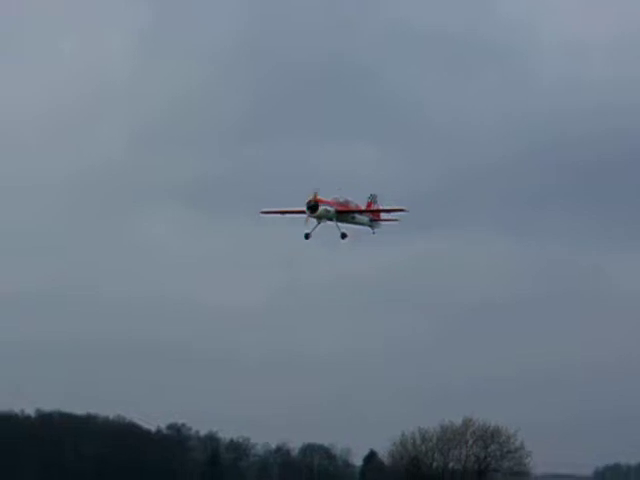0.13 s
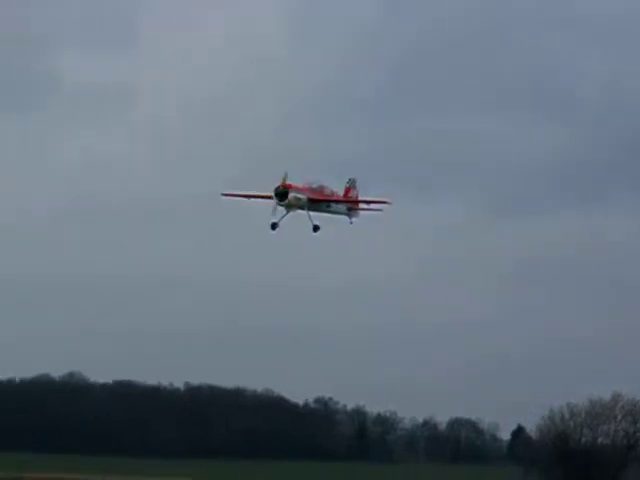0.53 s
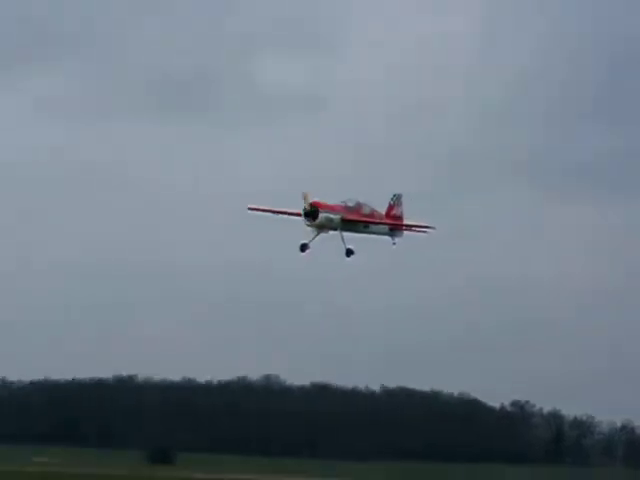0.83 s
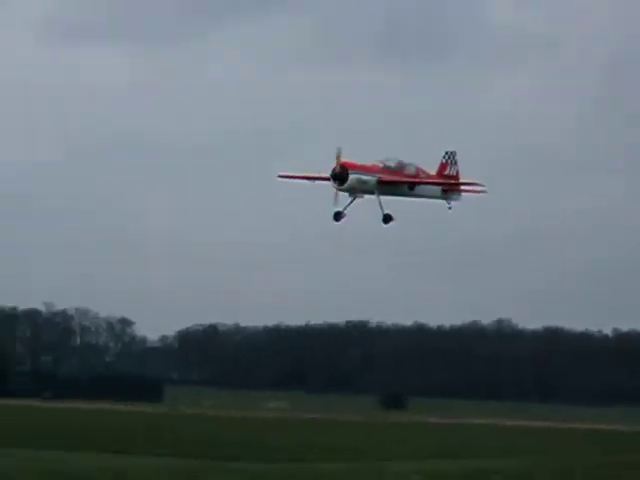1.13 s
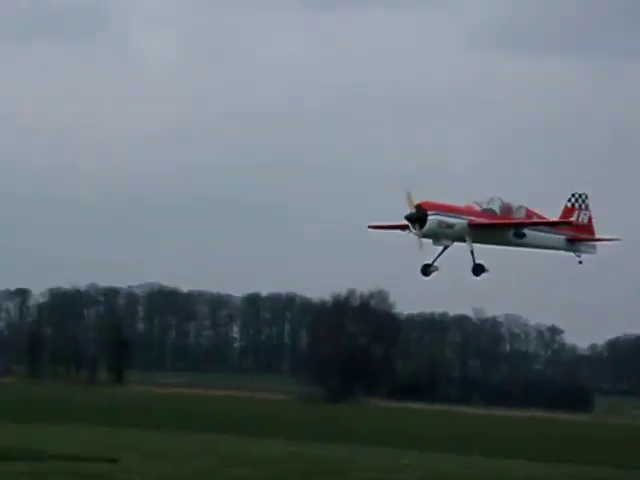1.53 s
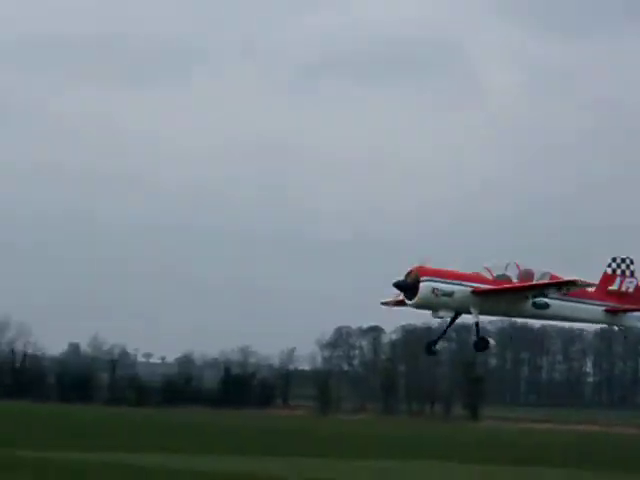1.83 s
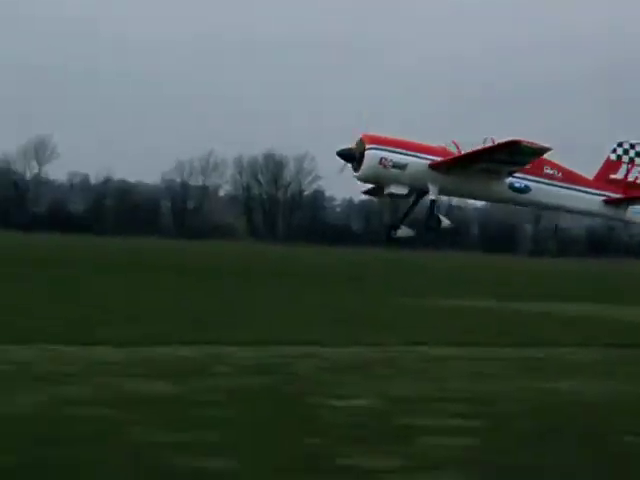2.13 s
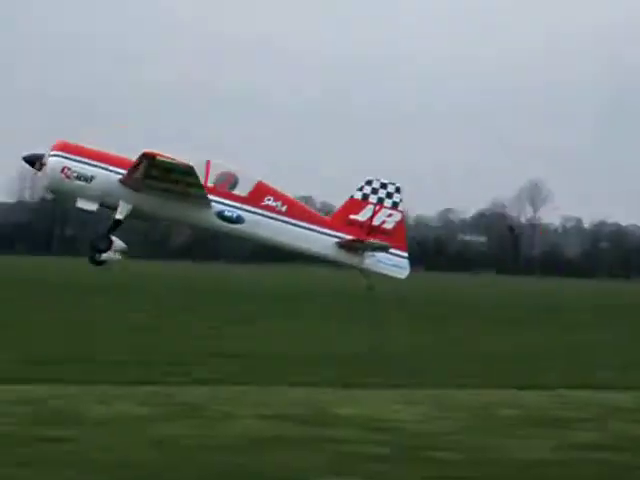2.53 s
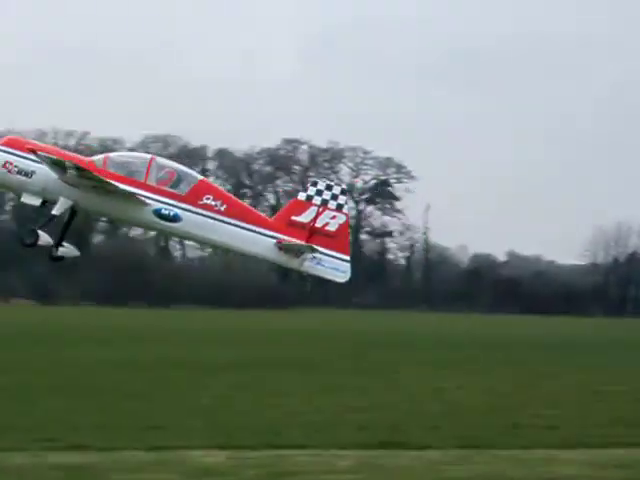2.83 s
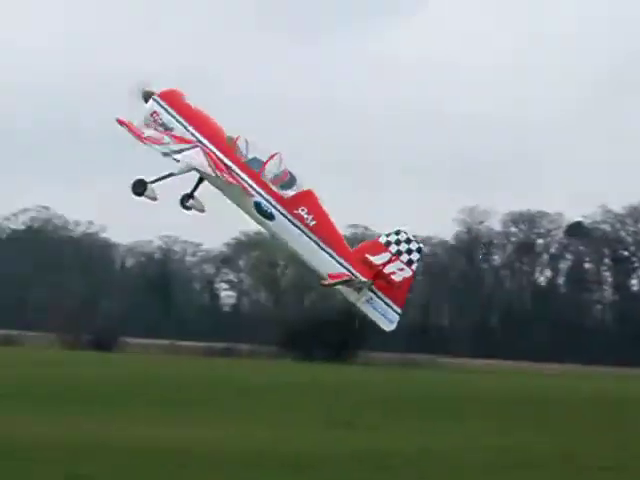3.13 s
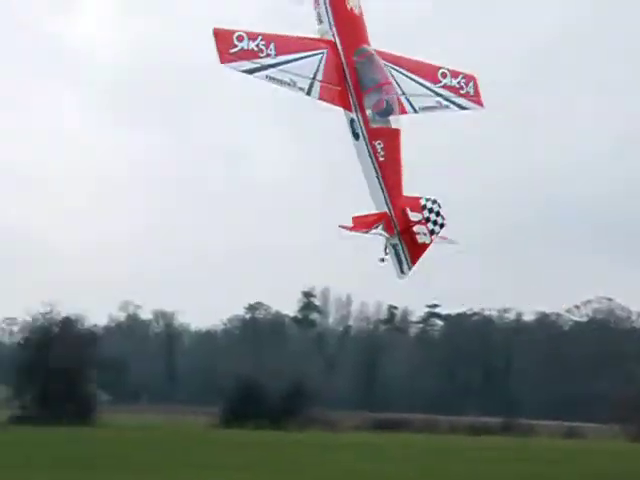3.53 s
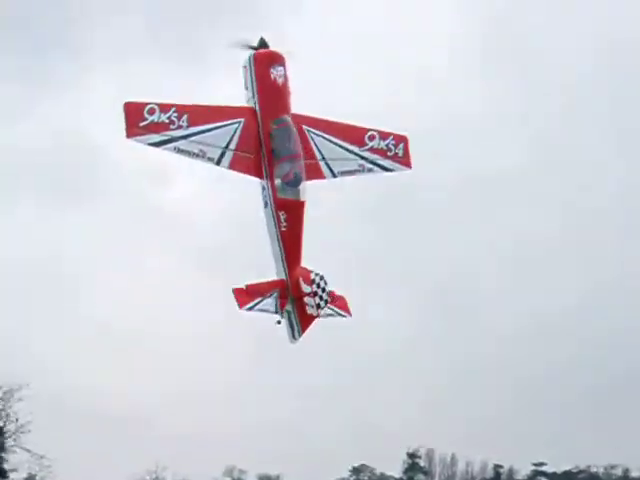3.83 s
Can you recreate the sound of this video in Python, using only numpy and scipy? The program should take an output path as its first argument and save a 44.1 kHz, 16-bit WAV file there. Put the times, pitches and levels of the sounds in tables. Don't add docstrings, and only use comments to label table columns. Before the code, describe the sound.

Model aeroplane engine putters by with propeller hiss, heavy wind thumps, then throttle opens into a climb.

```python
import sys
import numpy as np
from scipy import signal
from scipy.fft import rfft, irfft
from scipy.io import wavfile
from scipy.ndimage import uniform_filter1d, map_coordinates

SR = 44100
rng = np.random.default_rng(int(sys.argv[2]) if len(sys.argv) > 2 else 0)


def elevation(decibels):
    levels = np.asarray(decibels, float)
    return 10 ** (levels / 20)


def transcribe(u):
    v = np.clip(np.atleast_2d(u).T, -1, 1)
    q = np.round(v * 32767).astype(np.int16)
    wavfile.write(sys.argv[1], SR, q)


N = 176400


def along(points, hz):
    f, v = np.transpose(points)
    return np.interp(np.log(hz + 1), np.log(f + 1), v)


def unit(x):
    return x / np.sqrt(np.mean(x ** 2) + 1e-20)


def blend(a, b, share):
    return unit(np.sqrt(1 - share) * unit(a) + np.sqrt(share) * unit(b))


def curves(rows):
    s, *columns = np.transpose(rows)
    return [np.interp(np.arange(N) / SR, s, column) for column in columns]


def wobble(rate):
    knots = rng.standard_normal(int(N * rate / SR) + 4)
    return map_coordinates(knots, [np.arange(N) * rate / SR])


def coloured(x, points):
    size = 8192
    top_hz = min(points[-1][0] * 2, SR / 2)
    closed = [(points[0][0] / 2, -60), *points, (top_hz, -90)]
    cepstrum = irfft(np.log(elevation(along(closed, np.fft.rfftfreq(size, 1 / SR)))))
    cepstrum[1:size // 2] *= 2
    cepstrum[size // 2 + 1:] = 0
    pulse = irfft(np.exp(rfft(cepstrum)))[:size // 2]
    return signal.fftconvolve(x, pulse / np.abs(pulse).max())[:N]


def spikes(times, gains):
    at = np.clip((np.asarray(times) * SR).astype(int), 0, N - 1)
    return np.bincount(at, gains, N)


def bursts(rows, shape):
    s, db, hz = np.transpose(rows)[:, :, None]
    k = np.arange(-SR // 50, SR // 12)
    phase = rng.normal(0, 1, s.shape)
    tone = elevation(db) * shape(k / SR, hz) * np.cos(2 * np.pi * hz * k / SR + phase)
    at = np.clip((s * SR).astype(int) + k, 0, N)
    return np.bincount(at.ravel(), tone.ravel(), N + 1)[:N]


# (frequency [Hz], density [dB per Hz])
PROP_HISS = [(700, -15), (1300, -2), (2200, -8.5), (3300, -5.5), (3900, -10), (5100, -5), (6700, -16.5),
             (8300, -37)]
# (frequency [Hz], density [dB per Hz])
TIP_HISS = [(5500, -12), (7000, 1.5), (7800, -5), (8700, -17.5)]
# (time [s], share of low hiss hidden)
FUSELAGE_SHADE = [
    (2.6, 0),
    (2.75, .6),
    (3.1, .6),
    (3.25, 0),
]


def propeller(turns, level_db, chop_db):
    blades_db = chop_db * np.cos(4 * np.pi * turns)
    stroke_db = 1.5 * np.cos(2 * np.pi * (turns - .05))
    beat_db = blades_db + stroke_db
    hiss = unit(coloured(rng.standard_normal(N), PROP_HISS)) * elevation(beat_db + 1.1 * wobble(140))
    shaded_band = signal.butter(2, (1800, 2900), "band", fs=SR)
    hiss = hiss - curves(FUSELAGE_SHADE)[0] * signal.filtfilt(*shaded_band, hiss)
    flicker = unit(elevation(1.44 * beat_db + 2.1 * wobble(250)))
    tips = unit(coloured(rng.standard_normal(N), TIP_HISS)) * flicker
    return elevation(level_db - 2 + 0.36 * wobble(11.0)) * (hiss + elevation(-20 + 0.52 * chop_db) * tips)


# (frequency [Hz], level [dB])
IDLE_PIPE = [(110, -26), (200, 2.5), (330, -4.5), (490, 0.5), (730, 0), (860, -6), (1500, -14.5),
             (2800, -26)]
# (frequency [Hz], level [dB])
OPEN_PIPE = [(150, -24), (290, 0), (520, 0), (730, 0.5), (1080, -6.5), (1500, -10), (2600, -19.5),
             (4000, -27)]
# (frequency [Hz], one each)
RING_HZ = (495, 295, 750, 1080)
# (time [s], level of the first [dB], second [dB], third [dB], fourth [dB])
RING_LEVELS = [
    (3.05, -23.5, -27.5, -32, -29),
    (3.3, -13, -18, -29, -30),
    (3.55, -6, -12, -25, -31),
    (3.62, -9.5, -8, -21, -27),
    (3.75, -2, -7, -18, -29),
    (3.85, -22, -15.5, -14.5, -14.5),
    (4, -24, -11.5, -14.5, -14.5),
]
# (time [s], peak level [dB], ring [Hz])
BANGS = [(3.591, -11.5, 800), (3.1844, -23, 603), (3.2359, -14.5, 640), (3.2791, -23, 585),
         (3.3078, -16.5, 520), (3.3245, -20, 680), (3.3489, -19, 620), (3.3926, -19, 490),
         (3.4138, -21.8, 640), (3.4369, -17, 570), (3.4645, -20.5, 600), (3.5139, -19, 583),
         (3.54, -16, 520), (3.6, -6, 520), (3.6277, -21, 483), (3.6474, -22, 530), (3.6867, -13, 446),
         (3.7149, -8, 606), (3.7695, -5, 497), (3.7964, -14, 577), (3.812, -10, 604), (3.826, -5.5, 500),
         (3.8626, -2, 554), (3.8814, -7, 474), (3.8976, -10, 528), (3.9094, -20, 643), (3.9209, -5, 603),
         (3.9364, -21, 580), (3.9642, -14, 455), (3.981, -8, 475), (3.9949, -20, 570)]
# (frequency [Hz], level [dB])
MUFFLER = [(200, -20), (400, -7), (510, 1), (640, -7), (950, -5.5), (1500, -7), (3000, -26), (5000, -38.5)]


def puffs(fire):
    fade = np.exp(-np.arange(SR // 10) / SR / .009)
    return signal.fftconvolve(fire, fade)[:N] * rng.standard_normal(N)


def hard_firings():
    rise_s, t60_s = .0026, .045

    def swell(t, hz):
        return np.where(t < 0, np.exp(-(t / rise_s) ** 2), elevation(-60 * t / t60_s))

    s, db, _ = np.transpose(BANGS)
    spit = coloured(puffs(spikes(s - rise_s, elevation(db))), MUFFLER)
    return elevation(-5) * bursts(BANGS, swell) + elevation(-24.5) * spit


def exhaust(turns, level_db):
    opens_s, opening_s = 3.585, .006
    opened = np.clip((np.arange(N) / SR - opens_s) / opening_s, 0, 1)
    jitter = .04 * (1 - .75 * opened) * wobble(40)
    at = np.flatnonzero(np.diff(np.floor(turns + jitter)) > 0) / SR
    fire = spikes(at, elevation(1.7 * rng.standard_normal(len(at))))
    gas = puffs(fire)
    flow = rng.standard_normal(N) * elevation(0.38 * wobble(15))

    def through(pipe, puff_share, roar_share):
        firing = blend(coloured(fire, pipe), coloured(gas, pipe), puff_share)
        return blend(firing, coloured(flow, pipe), roar_share)

    steady = (1 - opened) * through(IDLE_PIPE, .8, .62) + opened * through(OPEN_PIPE, .6, .55)
    ring = 0
    for hz, db in zip(RING_HZ, curves(RING_LEVELS)):
        resonance = signal.iirpeak(hz, hz / 55, SR)
        ring = ring + unit(signal.lfilter(*resonance, steady)) * elevation(db)
    return elevation(level_db) * (steady + ring) + hard_firings() * elevation(-5 * opened)


def ground(x, delay_ms):
    late = map_coordinates(x, [np.arange(N) - delay_ms * SR / 1000], order=3)
    dull = signal.filtfilt(*signal.butter(2, 1800, fs=SR), late)
    gain = .7 - .09 * delay_ms
    return (x + gain * dull) / np.sqrt(1 + gain ** 2)


# (time [s], propeller level [dB], exhaust level [dB], ground echo delay [ms], blade chop [dB])
FLIGHT = [(0, -38.5, -41, 1.56, 1.5), (.35, -39, -40.5, 1.71, 1), (1, -34, -35.5, 1.59, 0),
          (1.5, -32.5, -33.5, 1.64, 1), (2, -34.5, -33, 1.3, 2.5), (2.3, -36.5, -28.5, 1.35, 1.7),
          (2.55, -35.5, -27, 1.3, 3), (2.75, -39.5, -43, 1.5, 3), (2.95, -38, -37, 1.6, 3.5),
          (3.12, -36.5, -33, 1.76, 3.5), (3.28, -37.5, -29, 2.01, 5.5), (3.5, -40, -34, 2.25, 1),
          (3.585, -40.5, -35.5, 2.44, 6.5), (3.591, -37.5, -25, 2.25, 5.5), (3.75, -36, -26.5, 2.71, 4),
          (3.87, -33, -22, 2.74, 3.5), (4, -31.5, -22.5, 3.18, 1.5)]
# (time [s], shaft speed [turns per s])
SHAFT = [(0, 37.97), (.6, 40.69), (1.2, 39.57), (1.7, 39.03), (2, 37.65), (2.2, 36.16), (2.4, 40.97),
         (2.6, 37.79), (2.85, 35.71), (3.08, 34.95), (3.2, 38.75), (3.32, 44.17), (3.5, 39.1), (3.6, 39.18),
         (3.75, 51.66), (3.87, 58.08), (4, 63.16)]


def plane():
    prop_db, pipe_db, delay_ms, chop_db = curves(FLIGHT)
    turns = .11 + np.cumsum(curves(SHAFT)[0]) / SR
    engine = propeller(turns, prop_db, chop_db) + exhaust(turns + .08, pipe_db)
    return ground(engine, delay_ms)


# (time [s], strength [dB])
GUSTS = [(.08, -44), (.3, -46), (.7, -39), (.84, -39), (.99, -44), (1.14, -38), (1.3, -36.5), (1.98, -30),
         (2.06, -32), (2.15, -28), (2.28, -36), (2.43, -30.5), (2.47, -31), (2.65, -19), (2.86, -24),
         (2.89, -28), (3.3, -41), (4, -33)]
# (frequency [Hz], density [dB per Hz])
STRONG_WIND = [(15, -46), (25, -60), (121, -6.5), (326, 1.5), (642, -6.5), (1220, -27), (1490, -32.5),
               (2000, -32), (2600, -60), (4400, -120)]
# (frequency [Hz], density [dB per Hz])
CALM_WIND = [(25, -15.5), (70, -10.5), (130, -2.5), (200, 0), (350, -7), (700, -11), (2000, -35)]


def rumble():
    strong_db, calm_db = -21, -29
    eddies_per_s, eddy_spread_db, eddy_share = 190, 8, .55
    gust_db, = curves(GUSTS)
    when, side, size = rng.random((3, int(eddies_per_s * N / SR)))
    eddies = spikes(when * N / SR, np.sign(side - .5) * elevation(eddy_spread_db * size))
    flow = rng.standard_normal(N) * elevation(0.72 * wobble(24.87))
    push = np.sqrt(eddy_share) * unit(eddies) + np.sqrt(1 - eddy_share) * flow
    bright = np.clip((gust_db - calm_db) / (strong_db - calm_db), 0, 1)
    strong = 1.18 * unit(coloured(push, STRONG_WIND))
    calm = unit(coloured(push, CALM_WIND))
    flutter_db = 1.8 * wobble(26)
    return elevation(gust_db + 1.0 + flutter_db) * (bright * strong + (1 - bright) * calm)


# (time [s], peak level [dB], pitch [Hz])
THUMPS = [(0.7733, -27, 219), (0.8393, -21.9, 214), (1.1221, -23, 227), (1.151, -18.5, 250),
          (1.2343, -19.6, 206), (1.3536, -25.5, 224), (1.4633, -27, 219), (1.5432, -21, 233),
          (1.6506, -19.5, 190), (1.7404, -25, 185), (1.8133, -21.5, 227), (1.843, -28, 219),
          (1.9852, -16, 202), (2.0422, -20.5, 250), (2.1332, -12.5, 268), (2.1595, -16.5, 242),
          (2.2363, -17.5, 238), (2.312, -20, 208), (2.3378, -21.5, 221), (2.4622, -8.5, 183),
          (2.4689, -13.5, 267), (2.478, -8.5, 523), (2.4865, -16, 313), (2.5062, -7.5, 320),
          (2.5204, -18, 358), (2.5376, -4, 303), (2.545, -21, 397), (2.5566, -7, 293), (2.5677, -21.5, 418),
          (2.5796, -16.5, 263), (2.5905, -7, 425), (2.6032, -4.5, 228), (2.6131, -3.7, 359),
          (2.6218, -8.5, 398), (2.6324, -3, 295), (2.6512, -3, 399), (2.6605, -0.5, 473),
          (2.6743, -16, 305), (2.6804, -4.5, 622), (2.6978, -8.5, 305), (2.7092, -21, 367),
          (2.7165, -23, 424), (2.7269, -24.5, 317), (2.7343, -9.5, 294), (2.7456, -10.5, 363),
          (2.7509, -6, 572), (2.7623, -14, 433), (2.776, -7.7, 348), (2.7859, -5.7, 423),
          (2.7931, -9.5, 496), (2.8046, -19, 345), (2.821, -9.5, 243), (2.8404, -15, 404),
          (2.8487, -20, 418), (2.8642, -4, 409), (3.0362, -19, 280), (3.0823, -17, 268), (3.1376, -19, 268),
          (3.1911, -15.5, 298), (3.2358, -19.5, 258)]


def thumps():
    def lump(t, hz):
        return np.exp(-.5 * (t * hz / .33) ** 2)

    fronts = np.array(THUMPS) * [1, 1, 2.44]
    pressure = bursts(THUMPS, lump) + elevation(-15) * bursts(fronts, lump)
    return elevation(1) * signal.lfilter(*signal.butter(2, 75, "high", fs=SR), pressure)


# (time [s], peak level [dB])
SLAPS = [(2.613, -21), (2.651, -13), (2.662, -22), (2.680, -28), (2.704, -19), (2.717, -22), (2.76, -28),
         (2.819, -33), (2.863, -31), (3.234, -28)]
# (frequency [Hz], level [dB])
SLAP_COLOUR = [(500, -12.5), (1200, 11.5), (1900, 1.5), (2600, -20.5), (4000, -15.5)]


def slaps():
    s, db = np.transpose(SLAPS)
    return coloured(spikes(s, elevation(db)), SLAP_COLOUR)


def wind():
    return rumble() + thumps() + slaps()


def damped_rings(s, level_db, ring):
    out = np.zeros(N)
    for hz, db, t60, late, rise in ring:
        t = np.maximum(np.arange(N) / SR - s - late, 0)
        decay = elevation(level_db + db - 60 * t / t60)
        out -= decay * (1 - np.exp(-t / rise)) * np.sin(2 * np.pi * hz * t)
    return out


# (frequency [Hz], level [dB], t60 [s], delay [s], rise [s])
KNOCK = [(990, 5, .017, .0036, .0014), (520, 1, .012, .0003, .0001), (1900, -13, .008, 0, .0001),
         (3000, -17, .008, .0005, .0001), (850, -14, .07, .002, .002)]
# (frequency [Hz], level [dB], t60 [s], delay [s], rise [s])
SNAP = [(1000, -20, .04, .003, .002), (1100, -2, .005, 0, .0001), (2100, -2, .004, .0004, .0001),
        (3300, 1, .004, 0, .0001), (4300, -4, .003, .0003, .0001), (5700, -8, .004, 0, .0001)]


def camera_clicks():
    return damped_rings(.1105, -13, KNOCK) + damped_rings(.2323, -7, SNAP)


# (frequency [Hz], level [dB], t60 [s], delay [s], rise [s])
TWEET = [(4960, 0, 0.019, 0.087, 0.0076), (4250, -1, .02, .017, .003)]


def bird():
    return damped_rings(3.08, -41, TWEET)


# (frequency [Hz], level [dB])
MIC = [(20, -15), (100, 0), (300, -2.5), (1600, -2.5), (1790, -9), (1900, -10), (2200, -2), (20000, 4.5)]


def scene():
    small = camera_clicks() + bird()
    thin = signal.lfilter(*signal.butter(2, 250, "high", fs=SR), small)
    return (coloured(plane() + wind(), MIC) + thin)[None]


def band_limit(x):
    return signal.sosfilt(signal.butter(12, 8860, fs=SR, output="sos"), x)


def record(dry):
    agc_db, agc_ratio, agc_s = -25, .13, .041
    start_s, ceiling, offset = .0725, .72, .0022
    power = np.abs(uniform_filter1d(dry ** 2, int(agc_s * SR), axis=1))
    loud_db = 10 * np.log10(power + 1e-12)
    x = dry * elevation(-agc_ratio * np.maximum(loud_db - agc_db, 0))
    x = x / (1 + np.abs(x / ceiling) ** 4) ** .25
    x = signal.sosfilt(signal.butter(8, 8300, fs=SR, output="sos"), x)
    started = np.arange(N) >= start_s * SR
    return band_limit((x + offset) * started)


dry = scene()
out = record(dry)
transcribe(out)
```